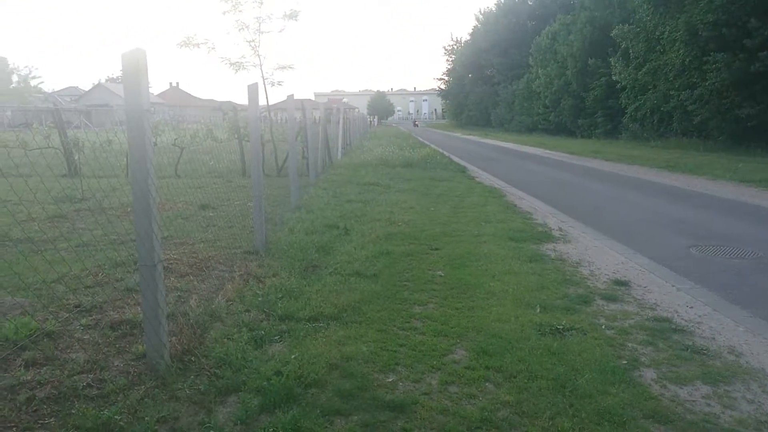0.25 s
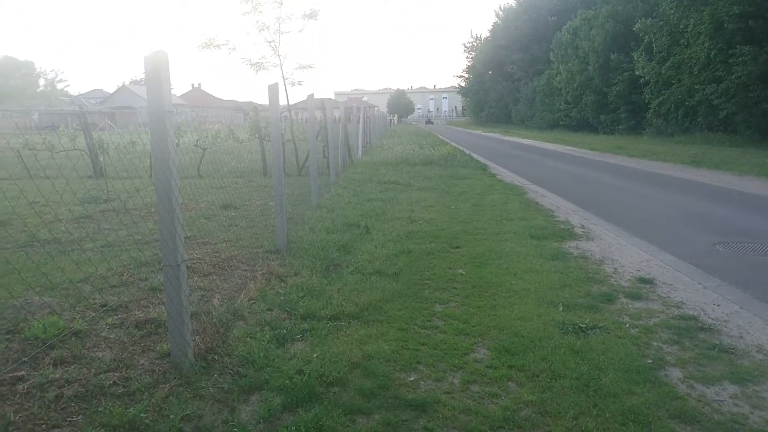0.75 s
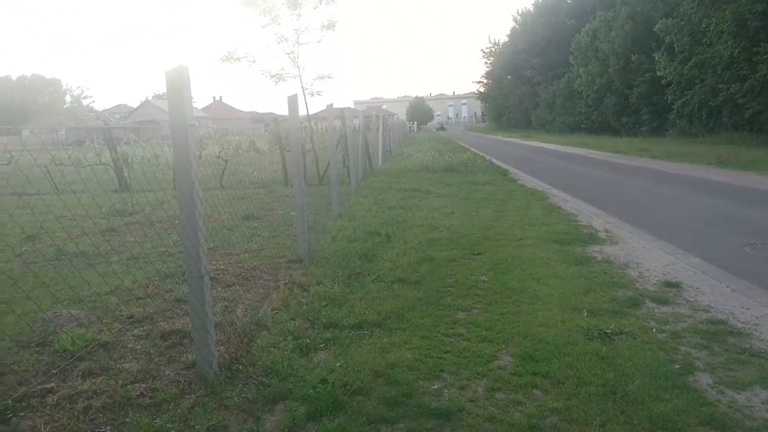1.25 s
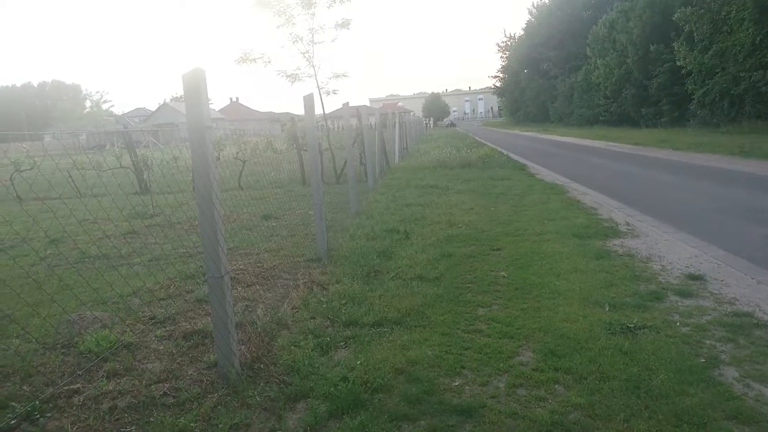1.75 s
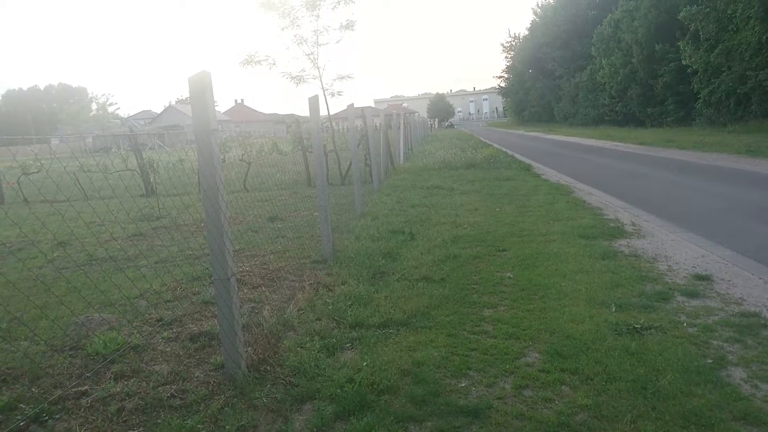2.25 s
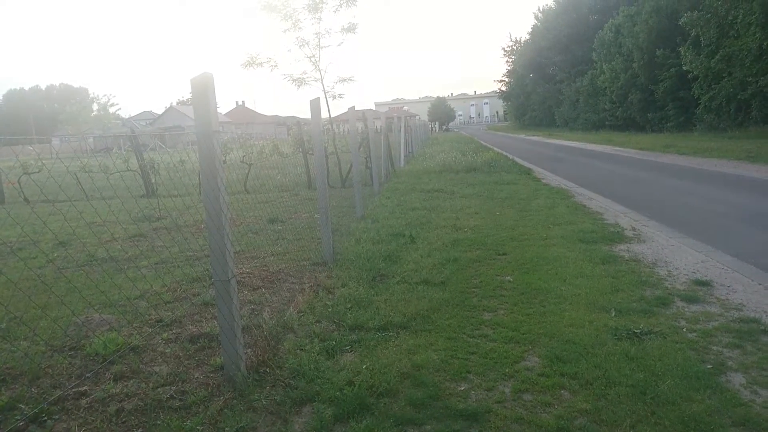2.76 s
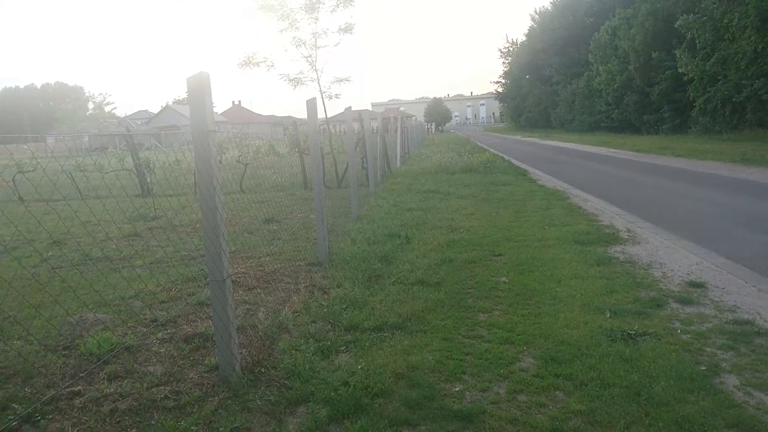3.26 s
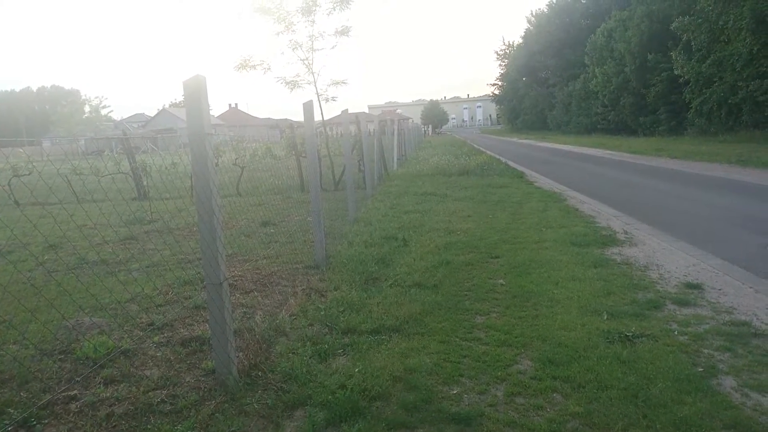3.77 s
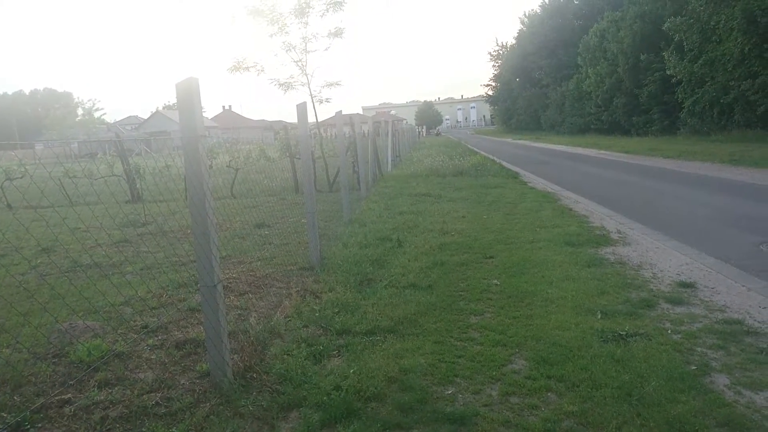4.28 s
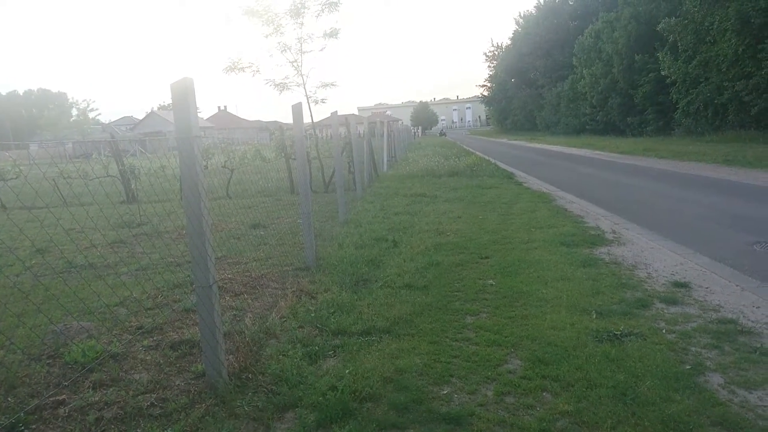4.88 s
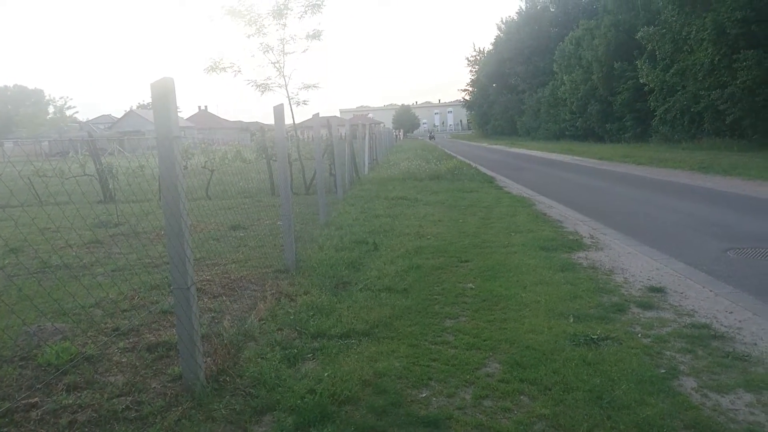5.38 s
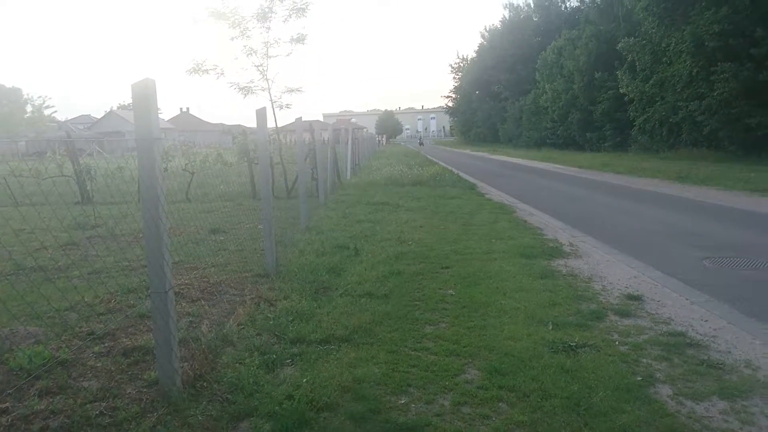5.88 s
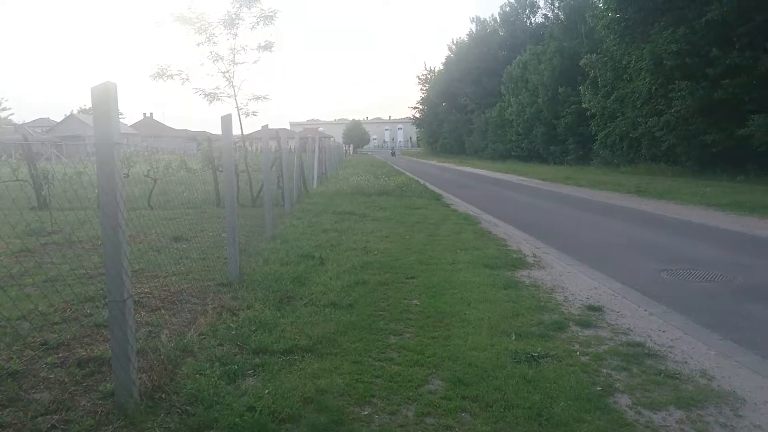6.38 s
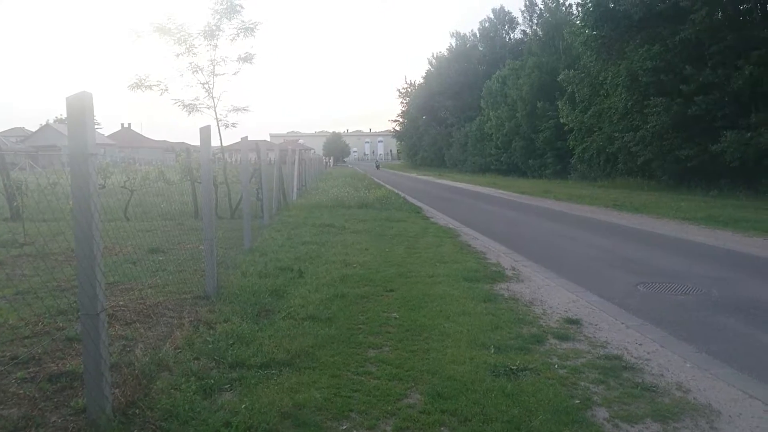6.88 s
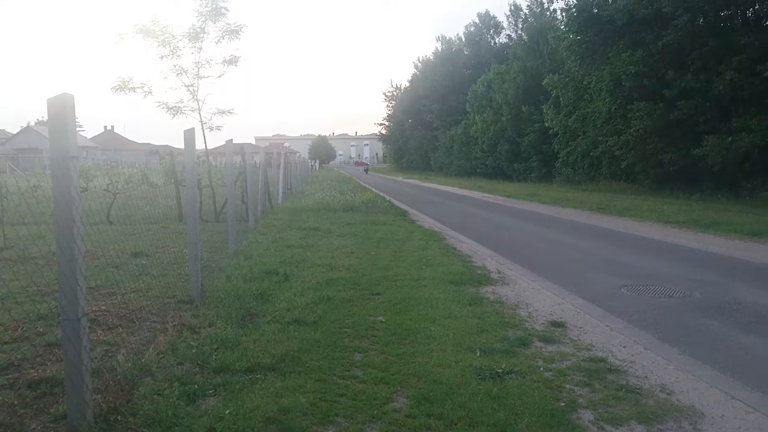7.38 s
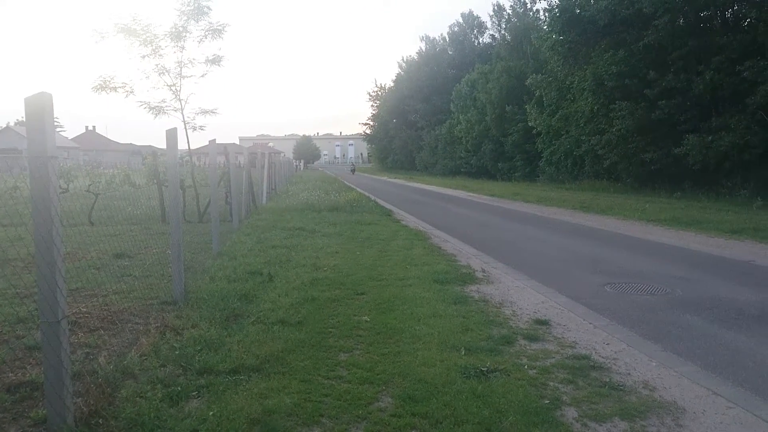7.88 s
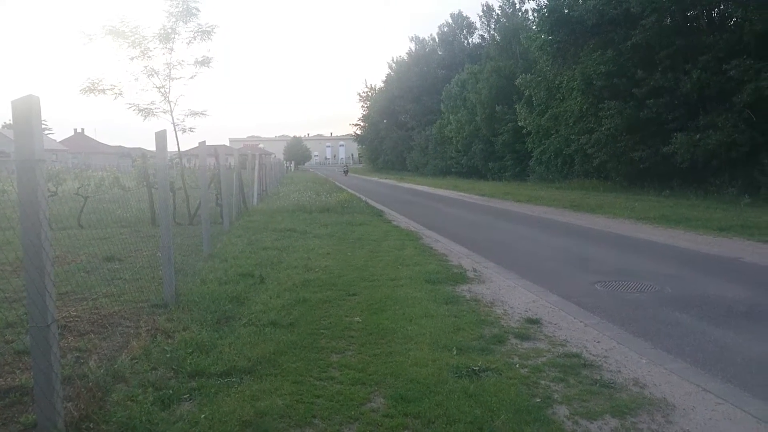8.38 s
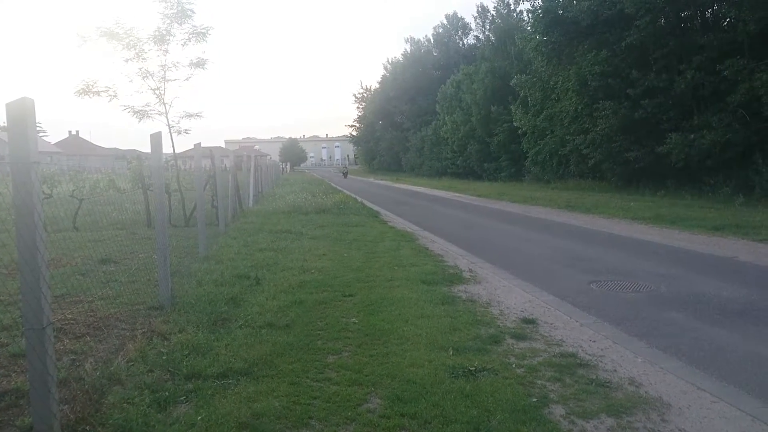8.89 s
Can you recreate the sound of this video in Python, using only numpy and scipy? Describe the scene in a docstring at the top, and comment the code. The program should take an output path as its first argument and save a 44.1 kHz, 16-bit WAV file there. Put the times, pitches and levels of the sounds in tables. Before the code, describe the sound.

On a quiet rural road with a low outdoor rumble, a swallow twitters sharply for about two seconds. Far off, a small two-stroke motorcycle idles unevenly, blips its throttle three times, then moves off. Its rough sputter tightens into a rising raspy buzz, dips briefly at one gear change, and climbs again, louder and nearer, with echoes from trees. The stationary microphone stands by the roadside.

```python
"""Two-stroke on a country road

A small motorcycle blips its throttle far down the road, pulls away and rides closer, rasping through one
gear change. Pulses from the turning crank drive boom, bark, buzz and rasp; speed, throttle, clutch and
distance set their levels, and the engine misfires in spells. Early on a swallow twitters in gliding,
fluttering tones. Noise decays stand for the trees' echo; filtered noise gives a low outdoor rumble."""
import sys
import numpy as np
from scipy import signal
from scipy.fft import rfft, irfft
from scipy.io import wavfile
from scipy.ndimage import uniform_filter1d

SR = 44100
rng = np.random.default_rng(int(sys.argv[2]) if len(sys.argv) > 2 else 0)


def persist_wave(psi):
    """Save psi, clipped to +-1, as 16-bit WAV."""
    counts = np.round(np.clip(psi, -1, 1) * 32767).astype(np.int16)
    wavfile.write(sys.argv[1], SR, np.atleast_2d(counts).T)


N = 403074
TIME = np.arange(N) / SR

# outdoor background, relative colour: [f/Hz, level/dB]
AIR = [(20, -46), (33, -22), (48, 1), (70, 2), (130, -4.5), (260, -8), (380, -20), (600, -25.5),
       (1000, -30.5), (1600, -35), (2300, -33.5), (5500, -30), (8000, -40), (12500, -44.5), (15500, -48.5)]
AIR_DB, WHISTLE_HZ = -53, 2170
# faint thin whistle: [start t/s, end t/s, level/dB]
WHISTLE = [(2.383, 3.161, -79), (3.662, 3.85, -81)]
TICK_S, TICK_DB = 6.915, -55  # one faint high tick

# the swallow's syllables, level before each voice's own gain: [t/s, level/dB, f/Hz]
TRILL = [(0.4432, -44.5, 5970), (0.5447, -40, 6320), (0.657, -39.5, 6170), (0.762, -40.5, 6120),
         (0.865, -36.5, 6440), (0.977, -38, 6010), (1.0855, -37.5, 6050), (1.1915, -37, 6040)]
SQUEAKS = [(0.335, -48.5, 4960), (1.3922, -42.5, 5200), (1.686, -42, 4785), (1.9747, -38, 5025)]
WHEETS = [(1.478, -34, 6260), (1.762, -34.5, 6380), (2.049, -35.5, 6290)]
CHIPS = [(0.2348, -66.5, 2850), (0.5568, -59, 3440), (1.288, -53, 3050), (1.586, -53.5, 2940),
         (1.859, -56, 2950), (2.242, -60, 2700), (2.4693, -66, 2870)]
# glide of each syllable before its random stretch: [t/s from its onset, pitch factor, level/dB]
TRILL_PATH = [(-.018, .7, -22), (-.006, .88, -14), (.002, .97, -3), (.012, 1.01, 0), (.022, .99, -2),
              (.028, .87, -6), (.033, .72, -12), (.038, .58, -22)]
SQUEAK_PATH = [(-.012, .8, -17), (0, .92, -10), (.012, 1.07, -4), (.026, 1.02, 1), (.04, .985, 0),
               (.058, .96, -7), (.075, .93, -18)]
OVERTONE_PATH = [(-.005, .88, -12), (.004, 1.07, -2), (.012, 1.25, 3), (.022, 1.3, 0), (.036, 1.2, -3),
                 (.056, 1.12, -10)]
UNDERTONE_PATH = [(-.012, .76, -9), (-.002, .65, -7), (.012, .8, 1), (.022, .72, 0), (.036, .58, -8)]
WHEET_PATH = [(-.012, .87, -13), (0, .96, -3), (.012, 1, 2), (.028, 1.02, -1), (.042, .97, -13)]
CHIP_PATH = [(-.004, 1, -8), (.007, 1.12, 1), (0.013, .98, 5.5), (0.024, 1, -11)]
CLEAR_WAVER, HOARSE_WAVER = .016, .055  # quick pitch waver, share of the pitch
SYLLABLE_STRETCH = .06  # spread of syllable length, share
# the ports' colours for sound from the side: [f/Hz, level/dB]
LEFT_PORT = [(2500, 1), (4800, -4), (5500, 2), (6200, 3.5), (6700, -5), (7500, -3.5)]
RIGHT_PORT = [(2500, -5.5), (4800, -1.5), (5500, -7.5), (6200, -6.5), (6700, -9.5), (7500, -9.5)]

# decay of the reflections from the trees: [f/Hz, t60/s]
TREES = [(100, 1), (1000, 1), (5000, 1), (10000, 0.14)]
TREE_LINE_M, TREE_ECHO_DB = 12, -19  # distance of the trees from the road; strength of their first echo
SOUND_M_PER_S = 343
# what a long path over grass takes from the bark: [f/Hz, level/dB]
GRASS = [(300, -2), (500, 0), (800, -6.5), (1100, -3.5), (2000, 2.5)]
# balance of the two microphone ports: [f/Hz, left minus right level/dB]
BALANCE_DB = [(100, -0.5), (300, -1.5), (550, 0), (850, 1), (1900, 1), (2700, -11.5), (3400, 6.5),
              (4200, 5), (4900, 2), (5600, 11), (6400, 26), (7200, 15), (8000, -24), (11000, 0)]
# the part of the sound in which the ports differ: [f/Hz, level/dB]
UNLIKE = [(60, -31), (200, -23), (400, -15), (800, -11), (2000, -7), (6000, -7), (12000, -4)]
EDGE_HZ = 15600  # top of the recorder's band

# throttle blips at a standstill: [start t/s, length t/s, top crank speed f/Hz, throttle 0-1]
BLIPS = [(1.289, 0.26, 57.1, 0.31), (1.994, 0.15, 58.6, 0.5), (2.48, 0.17, 66, 0.5)]
IDLE_HZ, RUN_DOWN_S = 30, .15  # crank speed at idle, one firing a turn; time constant of a dying blip
# crank speed with the clutch slipping, in the lower gear, through the change, in the higher gear: [t/s, f/Hz]
MOVE_OFF = [(2.45, IDLE_HZ), (2.76, 57.44), (3.35, 67.46), (3.58, 66.1)]
FIRST_PULL = [(3.7, 59.3), (3.78, 54.33), (3.94, 52.58), (4.45, 62.16), (4.62, 62.8), (4.72, 67.5),
              (4.94, 63.2), (5.08, 66.5), (5.17, 66.46), (5.36, 78.23), (5.56, 72.5), (5.68, 80.03),
              (6.2, 87.9), (6.55, 95.25), (6.7, 99.9), (7.0, 111.7), (7.15, 119.1), (7.42, 135.6),
              (7.52, 141.8)]
GEAR_CHANGE = [(7.59, 125.8), (7.659, 135.9), (7.74, 111.9), (7.809, 97.35), (7.931, 112.5)]
SECOND_PULL = [(7.97, 101), (8.005, 97.7), (8.056, 105.4), (8.086, 106.7), (8.125, 102.9), (8.2, 105.3),
               (8.6, 114.4), (9.0, 124), (9.14, 128.7)]
# the rider's hand: [t/s, throttle 0-1]
THROTTLE = [(2.5, 0), (2.75, 0.44), (3.55, 0.41), (4.7, 0.43), (5.17, 0.36), (5.4, 0.61), (5.55, 0.58),
            (5.63, 0.62), (6.1, 0.82), (6.8, 1), (7.519, 0.97), (7.552, 0.25), (7.61, 0.25), (7.665, 0.5),
            (7.71, 0.01), (7.795, 0.35), (7.81, 0.74), (7.94, 0.75), (7.98, 0.96), (9.14, 0.9)]
# the clutch bites as the bike moves off and is pulled briefly for the gear change: [t/s, engaged 0-1]
CLUTCH = [(3.33, 0.17), (3.73, 1), (7.68, 1), (7.73, 0.8), (7.79, 0.58), (7.88, 0.99)]
# the ride towards the microphone
START_M, LEAVES_S, ACCELERATION_M_PER_S2 = 84.14, 2.856, 2.36
FAR_M, NEAR_M = 79, 56.6  # between these distances the engine's colour turns from far to near
REFERENCE_HZ, REFERENCE_M = 120, 40  # where the loudness laws below start from

# spells of misfiring, at idle and under way: [start t/s, end t/s, average share of turns that misfire]
MISFIRES = [(0, 1.3, .28), (1.58, 2.0, .28), (2.17, 2.47, .28), (2.78, 3.7, 1 / 2), (5.96, 6.63, 1 / 3),
            (7.55, 7.63, 1 / 2), (7.7, 7.88, 1 / 3)]
UNEVEN_SHUT, UNEVEN_OPEN = .48, 0.075  # unevenness of the firings with the throttle shut and wide open
INTAKE_SHARE = 0.37  # strength of the intake gulps, half a turn after each firing, at full load
# loudness law of each engine part: [level/dB at the reference speed and distance on full throttle,
# dB per doubling of speed, dB lost with throttle shut, dB per halving of distance, dB lost with clutch out]
BOOM_DB = (-10, 4.5, 17.5, 5.5, 2)  # silencer
CHAMBER_DB = (-47.5, 1.5, 32, 0.5, 10)  # drone of the expansion chamber
BARK_DB = (-35.5, 8.5, 25, 8.5, 7.5)  # tailpipe
BUZZ_DB = (-41, 23, 8.5, 7, 31)  # pipe wall
RASP_DB = (-40.5, 11, 5, 4, 8)  # thin metal
FIZZ_DB = (-71, 1, 0, 45, 0)  # top treble that only carries a short way
# colours of those parts, the rasp's from afar and from near: [f/Hz, level/dB]
BOOM = [(30, -40.5), (65, -6), (92, -4), (112, 1.5), (138, 10), (180, 7), (230, -2), (275, -4.5),
        (320, -15.5), (430, -24), (560, -39), (900, -62), (2000, -83.5)]
CHAMBER = [(200, -42.5), (270, -11), (312, 1), (385, 4.5), (430, 0), (480, -8.5), (560, -22), (700, -41),
           (1200, -66.5)]
BARK = [(200, -33.5), (320, -2), (420, -4.5), (520, -5.5), (620, 0.5), (720, 5), (840, 4), (920, -11),
        (1030, -1.5), (1130, -3.5), (1250, -17.5), (1700, -33), (3000, -61.5)]
BUZZ = [(600, -30.5), (1200, -7.5), (1450, -1), (1600, -5), (1900, 2), (2150, -1), (2420, 3), (2800, -12),
        (3150, -13.5), (4000, 0.5), (7000, -49.5)]
RASP_FAR = [(1000, -62.5), (2500, -13), (3100, -26.5), (3700, -0.5), (3950, -17), (4250, 0), (4550, 2),
            (5100, 2.5), (5450, 6), (5800, 0.5), (6150, 6), (6800, -5), (7600, -19.5), (12000, -61.5)]
RASP_NEAR = [(1500, -21), (3000, -6), (3400, 4), (3700, -9), (4050, -10), (4400, 3.5), (4900, 0),
             (5550, 2.5), (5900, 2), (6350, 5.5), (6900, -9.5), (7700, -25.5), (10000, -41), (15000, -77)]
FIZZ = [(7000, -15), (9500, 4), (11000, -17), (12500, 4.5), (15000, -33)]
# multiples of the crank speed that the exhaust pulse favours: [multiple, level/dB]
ORDERS = [(3, 1), (4, 2), (5, -8.5), (6, -1.5), (7, 1), (8, 1.5), (9, -1), (10, -4), (12, -4), (14, 0),
          (17, -2.5), (19, -0.5), (22, 0.5)]
# share of the exhaust note that turns to hiss: [near on full throttle, added far away, added with throttle shut]
BLUR = (.19, .3, .72)
# ringing bands in the rasp that shift with nearness: [nearness 0-1, f/Hz, level/dB]
RING = [(0, 4290, -11.5), (.45, 4090, -7.5), (.7, 4010, -6.5), (1, 3980, -13)]
HIGH_RING = [(0, 5450, -13), (.2, 5507, -21), (.45, 5350, -20), (1, 5346, -29)]
WANDER_DB, WANDER_HZ, WANDER_S = 1.2, 320, .4  # patches of wandering colour in the rasp: depth, width, length
# coughs of the exhaust as the throttle reopens in the gear change: [t/s, level/dB]
COUGHS = [(7.802, -44.5)]
# loose metal knocking on the machine, before a common trim: [t/s, level/dB]
KNOCKS = [(2.373, -44), (2.4243, -48), (2.5344, -42.5), (2.5835, -54), (2.892, -48), (2.9287, -47),
          (2.9612, -45), (3.1222, -49), (3.2196, -49), (3.602, -47), (5.1605, -43.5)]
# piston slap while the engine labours at low revs: [start t/s, end t/s, gain level/dB]
SLAP = [(3.92, 4.159, -51.5), (4.165, 4.846, -49), (4.852, 5.399, -54.5)]
# colour of the piston slap: [f/Hz, level/dB]
SLAP_RING = [(1500, -33), (2450, -10.5), (3100, -19), (3700, -5.5), (4250, -3), (5600, -0.5), (6600, -4),
             (7600, -27), (12000, -59)]


def amp(db):
    """Decibels to gain."""
    return 10 ** (np.asarray(db) / 20)


def curve(rows, column=1):
    """One column of a table of times, at every sample."""
    rows = np.array(rows, float)
    return np.interp(TIME, rows[:, 0], rows[:, column])


def read(points, hz):
    """A spectrum table on a log-frequency axis."""
    f, value = np.transpose(points)
    return np.interp(np.log(hz + 1), np.log(f), value)


def spells(rows, edge):
    """Each (start s, end s, value) holds its value, with soft edges; zero in between."""
    total = 0
    for start, end, value in rows:
        total = total + value * np.clip(np.minimum(TIME - start, end - TIME) / edge + .5, 0, 1)
    return total


def unit(x):
    """Scales to rms 1."""
    return x / np.sqrt(np.mean(x ** 2) + 1e-20)


def steady(x):
    """Holds the slow level near rms 1 and leaves single pulses alone."""
    power = uniform_filter1d(uniform_filter1d(x ** 2, size=5000), size=5000)
    return x / np.sqrt(abs(power) + 1e-3 * np.mean(power))


def drift(count, hz):
    """Random curve: straight lines between normal draws that come hz times a second."""
    t = np.arange(count) / SR * hz
    return np.interp(t, np.arange(count), rng.standard_normal(count))


def colour(x, points):
    """Causal minimum-phase filter with the given spectrum."""
    log_gain = np.log(amp(read(points, abs(np.fft.fftfreq(8192, 1 / SR)))))
    ring = np.fft.ifft(np.exp(np.conj(signal.hilbert(log_gain)))).real[:4096]
    return signal.oaconvolve(x, ring)[:N]


def add(mix, s, sound):
    """Adds a sound at time s."""
    part = mix[max(round(s * SR), 0):][:len(sound)]
    part += sound[:len(part)]


def scatter(x, t60s, delay):
    """Many weak reflections as decaying noise, each band dying at its own speed."""
    hz, t, z = signal.stft(rng.standard_normal(SR // 2), SR, nperseg=256)
    decay = amp(-60 * t / read(t60s, hz)[:, None])
    tail = signal.istft(z * decay, SR, nperseg=256)[1]
    tail = np.r_[np.zeros(round(abs(delay) * SR)), tail / np.linalg.norm(tail)]
    return signal.oaconvolve(x, tail)[:N]


def burst(rows, points, t60, rise=0.0046):
    """Short bursts of coloured noise at each (s, dB), with a quick rise and an exponential decay."""
    level, t = np.zeros(N), np.arange(SR // 5) / SR
    for s, db in rows:
        add(level, s, amp(db - 60 * t / t60) * np.minimum(t / rise, 1))
    return level * unit(colour(rng.standard_normal(N), points))


def background():
    """Low outdoor rumble and faint hiss from swelling noise, and a thin whistle from a wavering sine."""
    air = unit(colour(rng.standard_normal(N), AIR)) * amp(AIR_DB + 1.23 * drift(N, 2.98))
    level = spells([(start, end, amp(db)) for start, end, db in WHISTLE], edge=.06)
    pitch = WHISTLE_HZ + 3 * drift(N, 12)
    return air + level * np.sin(2 * np.pi * np.cumsum(pitch) / SR)


def high_tick():
    """One brief burst of high noise."""
    return burst([(TICK_S, TICK_DB)], [(4000, -36), (9000, 0), (12000, 3), (16000, -12)], t60=0.16, rise=0.0056)


def syllables(rows, path, gain_db, waver, flutter_db=3, vary=0.00916):
    """A fluttering whistle glides along the path at each row's pitch and level, bent and stretched by chance."""
    when, factor, path_db = np.transpose(path)
    song = np.zeros(N)
    for s, db, hz in rows:
        stretch = np.exp(SYLLABLE_STRETCH * rng.standard_normal())
        t = np.arange(when[0], when[-1], 1 / (SR * stretch))
        shape = amp(np.interp(t, when, path_db)) * signal.windows.tukey(len(t), .1)
        bend = 1 + waver * drift(len(t), 888) + vary * drift(len(t), 71.8)
        pitch = hz * np.interp(t, when, factor) * bend
        level = amp(db + gain_db + flutter_db * drift(len(t), 310))
        whistle = level * shape * np.sin(2 * np.pi * np.cumsum(pitch) / SR)
        add(song, s + when[0] * stretch, whistle)
    return song


def swallow(chip_echo=0.44):
    """Clear voices with hoarse ones beside them, and low chips, off to the right; fence and trees reflect them."""
    song = syllables(TRILL, TRILL_PATH, gain_db=-2.0, waver=CLEAR_WAVER)
    song += syllables(WHEETS, WHEET_PATH, gain_db=-7.0, waver=CLEAR_WAVER)
    song += syllables(SQUEAKS, SQUEAK_PATH, gain_db=-2.0, waver=CLEAR_WAVER)
    song += syllables(SQUEAKS, OVERTONE_PATH, gain_db=-4.0, waver=HOARSE_WAVER)
    song += syllables(TRILL + WHEETS, WHEET_PATH, gain_db=-14, waver=HOARSE_WAVER)
    song += syllables(TRILL + SQUEAKS + WHEETS, UNDERTONE_PATH, gain_db=-13.5, waver=HOARSE_WAVER)
    chips = syllables(CHIPS, CHIP_PATH, gain_db=-1.0, waver=HOARSE_WAVER)
    right = song + chips
    left = np.roll(right, 12)  # samples later than the right
    heard = []
    for direct, port in [(left, LEFT_PORT), (right, RIGHT_PORT)]:
        fence = amp(-7.5) * scatter(song, [(100, .12), (10000, .12)], delay=.005)
        trees = amp(-3.0) * scatter(song + chip_echo * chips, TREES, delay=0.008)
        heard.append(colour(direct + fence + trees, port))
    return np.array(heard)


def ride():
    """Crank speed, throttle, clutch and distance: blips at a standstill, then a steady acceleration."""
    speed = curve(MOVE_OFF + list(FIRST_PULL) + GEAR_CHANGE + list(SECOND_PULL))
    for start, length, top_hz, _ in BLIPS:
        rise = np.clip((TIME - start) / length, 0, 1) ** .65
        rev = rise * np.exp(-np.maximum(TIME - start - length, 0) / RUN_DOWN_S)
        speed = np.maximum(speed, IDLE_HZ + (top_hz - IDLE_HZ) * rev)
    blips = spells([(start, start + length, opening) for start, length, _, opening in BLIPS], edge=.06)
    throttle = np.clip(np.maximum(curve(THROTTLE), blips), 0, 1)
    clutch = np.clip(curve(CLUTCH), 0, 1)
    distance = START_M - ACCELERATION_M_PER_S2 * np.maximum(TIME - LEAVES_S, 0) ** 2 / 2
    return speed, throttle, clutch, np.maximum(distance, 10)


def loudness(law, speed, throttle, clutch, distance):
    """Gain of one part of the engine, following speed, throttle, nearness and load."""
    db, speed_db, shut_db, nearer_db, unloaded_db = law
    return amp(db + speed_db * np.log2(speed / REFERENCE_HZ) - shut_db * (1 - throttle)
               + nearer_db * np.log2(REFERENCE_M / distance) - unloaded_db * (1 - clutch))


def impulses(place, size):
    """Band-limited pulses at fractional sample positions."""
    taps = place.astype(int)[:, None] + np.arange(-8, 9)
    pulses = np.zeros(N)
    np.add.at(pulses, np.clip(taps, 0, N - 1), size[:, None] * np.sinc(taps - place[:, None]))
    return pulses


def firings(speed, unevenness, jitter=0.019, misfire_db=-11):
    """A pulse each turn, its return stroke half a turn later, its strength; burnt gas builds up to a misfire."""
    turns = np.cumsum(speed) / SR
    place = np.interp(np.arange(1, int(turns[-1]) + 1), turns, np.arange(N))
    at = place.astype(int)
    share, uneven, period = spells(MISFIRES, edge=.05)[at], unevenness[at], SR / speed[at]
    late, strong, luck = rng.standard_normal((3, 2000))[:, :len(at)]
    burnt_gas = np.cumsum(np.clip(share * (1 + .4 * uneven * luck), 0, 1))
    # within a spell, a turn misfires whenever the burnt gas passes a whole number
    missed = (np.diff(np.floor(burnt_gas), prepend=0) > 0) & (share > .1)
    size = np.exp(0.99 * uneven * strong) * amp(misfire_db * missed)
    place = place + jitter * uneven * late * period
    strength = np.interp(np.arange(N), place, size)
    return impulses(place, size), impulses(place + period / 2, size), strength


def gas(pulses, rough, fade=0.061, leak=0.36):
    """Pulses blended with turbulent gas: each leaves a puff of noise fading over fade seconds; rough is its share."""
    puff = signal.lfilter([1], [1, -np.exp(-1 / (fade * SR))], pulses)
    hiss = (puff + leak) * rng.standard_normal(N)
    rough = np.clip(rough, 0, 1)
    return (1 - rough) * steady(pulses) + rough * steady(hiss)


def exhaust_note(speed, count=38):
    """Wavering multiples of the crank speed, scaled to the power density of white noise."""
    turns, (multiple, db) = np.cumsum(speed) / SR, np.transpose(ORDERS)
    note = 0
    for k in range(3, count):
        level = amp(np.interp(k, multiple, db) + min(k / 4, 4) * drift(N, 9))
        phase = k * turns + rng.random() + .006 * k * drift(N, 25)  # in cycles
        note = note + level * np.cos(2 * np.pi * phase)
    return 2 * np.sqrt(speed / SR) * note


def tree_echo(x, distance):
    """The first echo lags more as the machine nears, so single harmonics swell and fade."""
    lag = (np.hypot(distance, 2 * TREE_LINE_M) - distance) / SOUND_M_PER_S
    return x + amp(TREE_ECHO_DB) * np.interp(TIME - lag, TIME, x)


def shimmer(depth_db, hz):
    """Moving air makes the level waver on its way."""
    return amp(depth_db * drift(N, hz))


def wander(x):
    """Moving air on the long path lifts and sinks single bands, in patches of frequency and time."""
    z = signal.stft(x, SR, nperseg=1024)[2]
    patches = rng.standard_normal(z.shape[::-1]).T
    # smooth twice along each axis; sizes in bins and frames
    for axis, size in enumerate([WANDER_HZ * 1024 / SR, WANDER_S * SR / 512] * 2):
        patches = uniform_filter1d(patches, round(size), axis=axis % 2, mode="wrap")
    return signal.istft(z * amp(WANDER_DB * unit(patches)), SR, nperseg=1024)[1][:N]


def resonate(x, hz, width):
    """A steep resonance, width in Hz, that follows the curve hz: shift down, low-pass, shift back."""
    turn, r = np.exp(2j * np.pi * np.cumsum(hz) / SR), np.exp(-np.pi * width / SR)
    return (turn * signal.lfilter([(1 - r) ** 2], [1, -2 * r, r * r], x / turn)).real


def ringing(grit, near, rows, width=260):
    """One band of thin metal rung by the firings; its pitch and strength follow nearness."""
    nearness, hz, db = np.transpose(rows)
    band = resonate(grit, np.interp(near, nearness, hz), width)
    return steady(band) * amp(np.interp(near, nearness, db))


def knocks():
    """Loose metal knocks ring with the rasp's far colour."""
    return amp(-3.5) * burst(KNOCKS, RASP_FAR, t60=0.082, rise=0.002)


def slap(pulses, returns, spread_db=1.5):
    """The piston rocks against the cylinder at both ends of its stroke: short dry clicks of uneven strength."""
    rocks = np.tanh(1.5 * (pulses + .7 * returns))
    uneven = rocks * amp(spread_db * drift(N, 60))
    click = signal.lfilter([1], [1, -np.exp(-1 / (.0024 * SR))], uneven)
    level = spells([(start, end, amp(db)) for start, end, db in SLAP], edge=0.046)
    noise = unit(colour(click * rng.standard_normal(N), SLAP_RING))
    return level * np.sqrt(np.mean(click ** 2)) * noise


def ports(x, lead=4e-5, most_phase=1.1):
    """Sound from the road leads at the left port by lead seconds; each port has its own colour."""
    hz = np.fft.rfftfreq(N, 1 / SR)
    phase = np.minimum(2 * np.pi * hz * lead, most_phase)
    ratio = amp(read(BALANCE_DB, hz)) * np.exp(1j * phase)
    side = irfft(rfft(x) * (ratio - 1) / (ratio + 1), N)
    return np.array([x + side, x - side])


def motorcycle():
    """The firings sound the silencer's boom, the tailpipe's bark and the thin metal of pipe and fins."""
    speed, throttle, clutch, distance = state = ride()
    near = np.clip((FAR_M - distance) / (FAR_M - NEAR_M), 0, 1)
    uneven = UNEVEN_SHUT * (UNEVEN_OPEN / UNEVEN_SHUT) ** throttle
    pulses, returns, strength = firings(speed, uneven)
    gulps = INTAKE_SHARE * clutch * throttle * returns

    # the boom swells whenever a harmonic crosses the silencer's resonance
    boom = colour(gas(pulses + gulps, rough=0.067), BOOM) * loudness(BOOM_DB, *state)
    drone = steady(colour(gas(pulses + gulps, rough=0.083), CHAMBER))
    chamber = drone * loudness(CHAMBER_DB, *state)

    # the note is clearest on full throttle; distance and a closing throttle blur it into hiss
    blur = np.clip(BLUR[0] + BLUR[1] * (1 - near) + BLUR[2] * (1 - throttle), 0, .85)
    note = exhaust_note(speed) * steady(strength)
    hiss = gas(pulses, rough=0.99)
    bark = unit(colour((1 - blur) * note + blur * hiss, BARK)) * loudness(BARK_DB, *state)
    buzz = unit(colour((1 - blur) * note + (blur + .2) * hiss, BUZZ)) * loudness(BUZZ_DB, *state)
    bark = near ** 2 * bark + (1 - near ** 2) * colour(bark, GRASS)
    bark = bark + burst(COUGHS, BARK, t60=0.25, rise=0.004)
    bark, buzz = tree_echo(bark, distance), tree_echo(buzz, distance)

    grit = gas(pulses, rough=0.75 + 0.14 * near, fade=0.0056, leak=0.055 + 0.67 * near)
    far_metal = np.sqrt(1 - near) * unit(colour(grit, RASP_FAR))
    near_metal = np.sqrt(near) * unit(colour(grit, RASP_NEAR))
    ring = ringing(grit, near, RING) + ringing(grit, near, HIGH_RING)
    metal = wander(steady(far_metal + near_metal) + ring)
    rasp = steady(metal * strength ** 0.17) * loudness(RASP_DB, *state)
    rasp = rasp * shimmer(depth_db=1.28, hz=12)
    fizz = unit(colour(grit, FIZZ)) * loudness(FIZZ_DB, *state)

    # the trees throw back more of the treble than of the boom, and more from afar
    thrown = amp(-12) * boom + amp(-9) * (chamber + bark) + amp(-7) * buzz + amp(-2) * rasp
    echo = scatter(thrown * (1 - .55 * near), TREES, delay=.012)
    engine = boom + chamber + bark + buzz + rasp
    mid = engine + fizz + knocks() + slap(pulses, returns) + echo
    side = scatter(colour(engine, UNLIKE), TREES, delay=.003)
    return ports(mid) + np.array([side, -side])


def scene():
    """The background all around, swallow to the side, motorcycle ahead."""
    air = background()
    spread = scatter(air, [(100, 0.19), (10000, 0.19)], delay=0.023)
    width = colour(spread, [(60, -21.5), (200, -15.5), (500, -4.0), (1000, 0.0)])
    return np.array([air + width, air - width]) + high_tick() + swallow() + motorcycle()


def record(dry):
    """The recorder's band limit: a steep low-pass."""
    low_pass = signal.firwin(511, EDGE_HZ, window=("kaiser", 9), fs=SR)
    return signal.oaconvolve(dry, low_pass[None], "same")


dry = scene()
out = record(dry)
persist_wave(out)
```